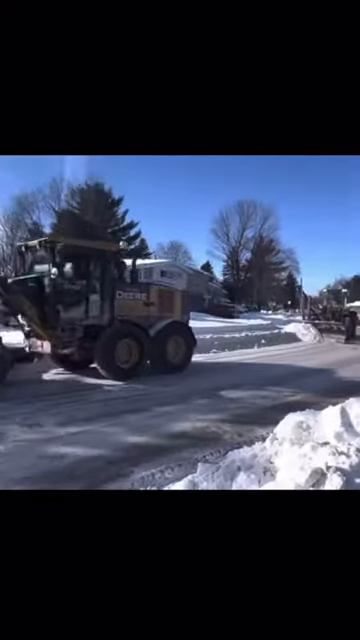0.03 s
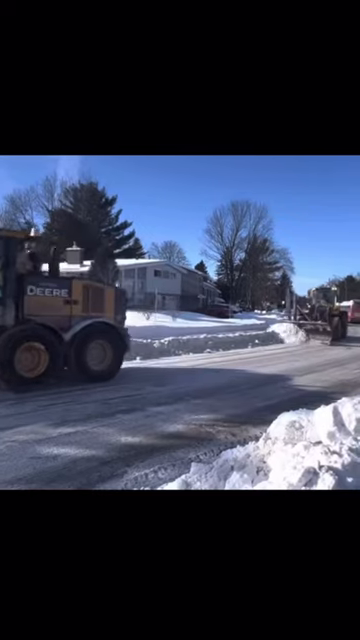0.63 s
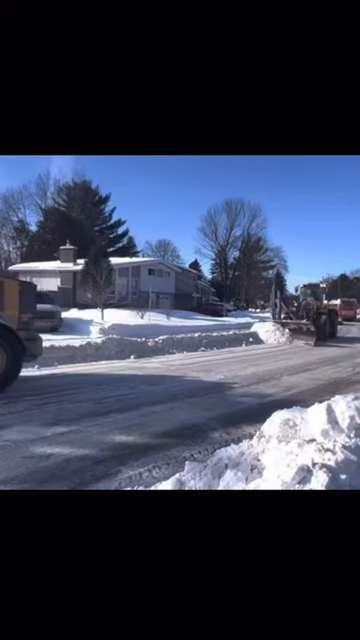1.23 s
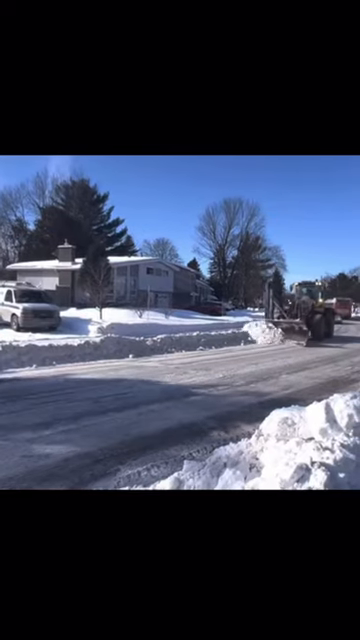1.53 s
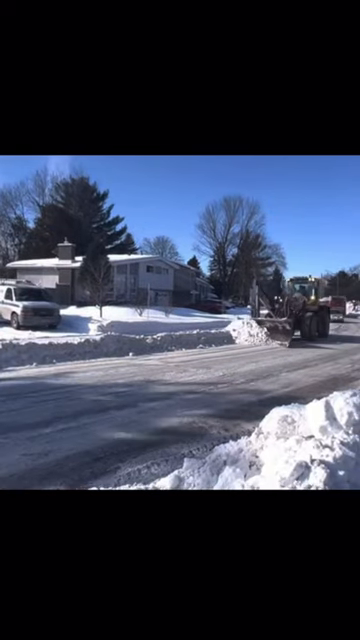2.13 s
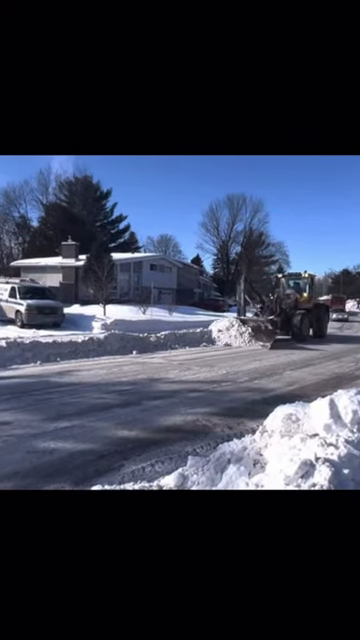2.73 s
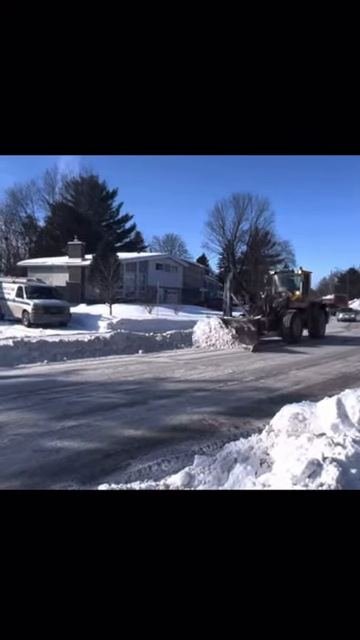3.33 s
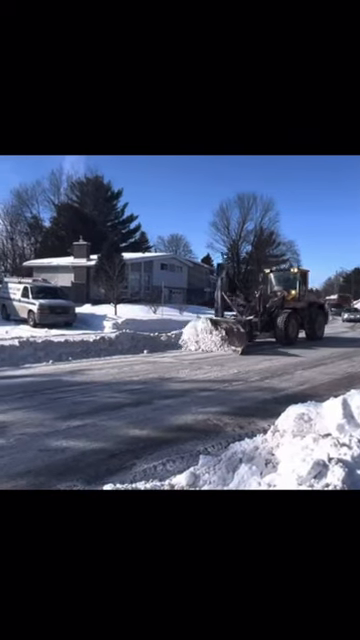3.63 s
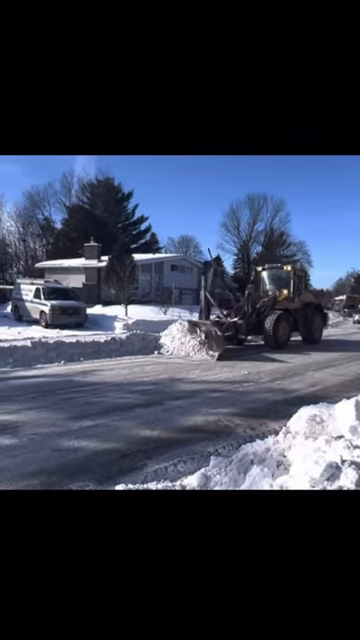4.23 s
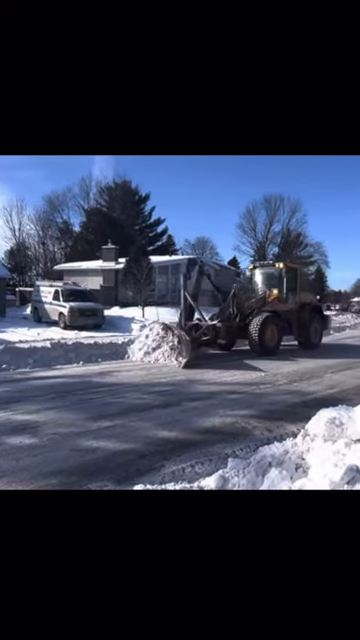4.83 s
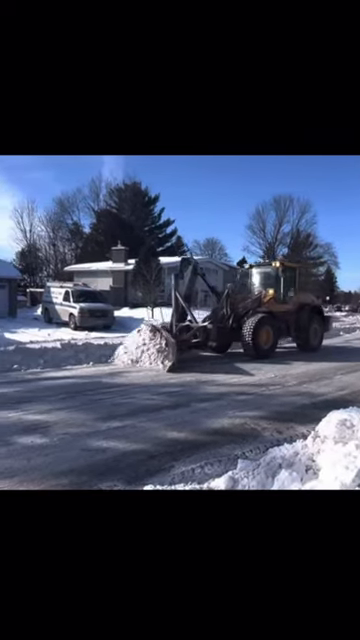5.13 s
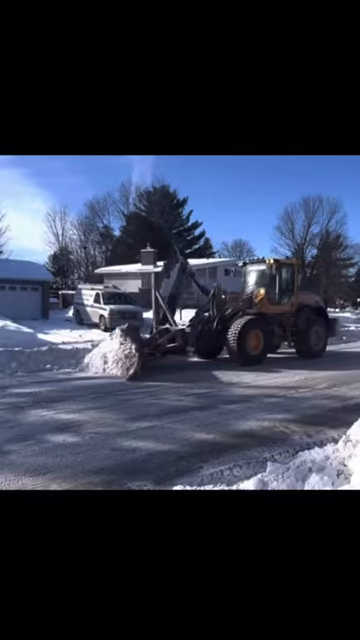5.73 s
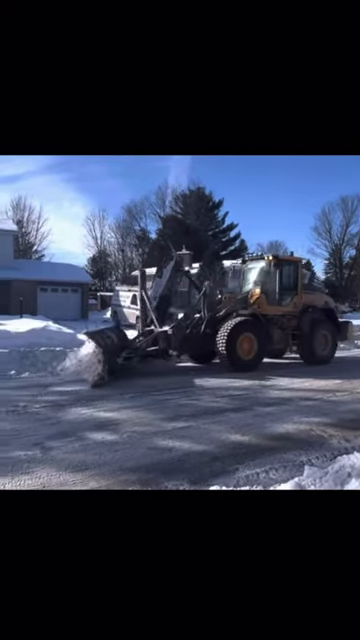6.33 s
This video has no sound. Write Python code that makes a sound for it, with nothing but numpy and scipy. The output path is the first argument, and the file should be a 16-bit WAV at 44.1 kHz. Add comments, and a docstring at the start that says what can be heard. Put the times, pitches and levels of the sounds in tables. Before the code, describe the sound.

Heard in stereo from the side of a residential street, a grader goes by with a loud diesel drone, clatter, rattling links and sharp steel clanks. Its blade scrapes through hard snow and its tyres drum over ice. As it recedes to the left with a wavering whine, an approaching wheel loader growls and shoves snow, ending with a brief, faint hydraulic whine.

```python
"""A grader clears a snowy street

A diesel grader passes close by and drives off to the left, while a wheel loader nears, pushing snow.
The grader's exhaust drones and hisses under a pump whine and a turbo whistle. Tyres rumble, blades
scrape over snow, and steel squeaks and clanks on the road. Two spaced microphone openings (ports)
hear it all, the grader reaching the left one first."""
import sys
import numpy as np
from scipy import signal
from scipy.fft import rfft, irfft, next_fast_len
from scipy.io import wavfile
from scipy.ndimage import uniform_filter1d, map_coordinates

SR = 44100
rng = np.random.default_rng(int(sys.argv[2]) if len(sys.argv) > 2 else 0)


def generate_wav(sig):
    """Save sig (samples, or channels by samples) to the path in sys.argv[1] as 16-bit PCM at SR."""
    pcm = np.round(np.clip(np.atleast_2d(sig).T, -1, 1) * 32767).astype(np.int16)
    wavfile.write(sys.argv[1], SR, pcm)


N = 290619
TIME_S = np.arange(N) / SR

GRADER_M_PER_S, NEAREST_M = 4.71, 4.9
# how each sound of the grader goes by: (loudest at [s], level [dB], falloff [1 = inverse distance])
DRONE_PASS, GEAR_PASS = (.74, -15, .93), (.19, -35, 1.3)
HISS_PASS, SHRILL_PASS = (1.3, -29.5, 1.36), (1.25, -35.5, 1.16)
CLATTER_PASS, RATTLE_PASS = (1, -29, .89), (1.3, -38.5, .95)
SIDE_ROAR_PASS, REAR_ROAR_PASS = (.95, -19.5, .87), (1.74, -19.5, .76)
RUMBLE_PASS, TREAD_PASS = (1, -19, .56), (1.93, -26, 2.2)

# engine speed, sagging under load: (time [s], firing rate [Hz])
ENGINE_SPEED = [(0, 89.9), (1.3, 90.4), (1.85, 86.2), (2.45, 84.9), (2.95, 85.4), (3.25, 86.6), (4.15, 88),
                (4.8, 87.3), (6.58, 87.1)]
# the exhaust's tone at three times the firing rate: (time [s], level [dB])
THIRD_HARMONIC = [(0, -26.5), (.55, -23), (2, -23.8), (2.8, -26.3), (3.4, -29.5), (4.45, -32.5),
                  (4.8, -38.5), (6.58, -43)]
# the pump's whine comes and goes: (time [s], level [dB])
PUMP_LEVEL = [(0, -37), (.32, -31.5), (.45, -36), (.65, -39), (1.15, -32.5), (1.5, -30.5), (1.65, -39),
              (1.98, -27.5), (2.1, -35), (2.22, -25.5), (2.35, -31.5), (2.43, -45), (2.54, -29.5),
              (2.65, -38), (2.71, -26.5), (2.85, -24), (2.93, -40), (3.1, -35.5), (3.4, -46), (3.82, -46),
              (3.9, -36), (4.03, -31), (4.13, -40), (4.26, -34.5), (4.37, -41), (4.56, -32.5), (4.7, -40),
              (4.82, -35.5), (5.12, -30), (5.38, -38), (5.62, -35), (5.86, -50), (6.06, -34.5),
              (6.3, -35.5), (6.45, -42), (6.52, -38)]
# it also sways between the ports: (time [s], extra lead on the left [radians])
PUMP_LEAD = [(0, -.6), (.2, -.8), (.55, 0), (1.4, -.5), (1.8, .1), (2.3, -.15), (2.8, .15), (3.4, 0),
             (4.05, .4), (4.28, 1.9), (4.45, .6), (5.3, 0), (6, .6), (6.58, .6)]
# the turbo speeds up after the sag, then runs down: (time [s], pitch [Hz])
TURBO_PITCH = [(0, 9175), (1.7, 9070), (2.5, 9420), (3.3, 9530), (4.1, 9160), (5.1, 8980), (6.58, 8790)]
# its clean whistle: (time [s], level [dB])
WHISTLE_LEVEL = [(0, -45), (.35, -49), (.75, -44.5), (1.05, -51), (2.1, -55), (2.4, -52), (2.9, -62),
                 (4.35, -59), (5, -47.5), (5.25, -50), (5.6, -63), (6.58, -85)]
# air rushing into the turbo: (time [s], level [dB])
INTAKE_LEVEL = [(0, -44), (1.55, -59), (2, -41), (3.6, -43.5), (4.1, -46), (4.35, -52), (5.2, -51.5),
                (6.58, -54)]
# extra puffs of exhaust gas: (time [s], level [dB], half length [s])
GAS_PUFFS = [(1.27, -40, 0.078), (1.85, -40.5, 0.11), (3.85, -45.5, .13), (4.05, -45, 0.073),
             (4.83, -56, .1), (5.39, -48, 0.11)]
# tones of the timing gears: (pitch [times the firing rate], relative level [dB])
GEAR_TONES = [(13, 0), (14.43, -1)]
# how hard each cylinder knocks, in firing order
KNOCK_STRENGTHS = [1, .25, .7, .2, .5, .35]

# lugged tyres drumming over rough ice: (time [s], level [dB], half length [s])
ICE_PATCHES = [(.9, -24, 0.19), (1.6, -19.5, 0.29), (4.48, -28.5, 0.29), (6.2, -29, 0.46)]
# the blade bites hard snow: (time [s], level [dB], half length [s], brightness [dB/octave], pitch [Hz])
BLADE_BITES = [(0.035, -22, 0.049, 2, 470), (.215, -28, .064, -4, 475), (0.457, -15.5, 0.04, -5, 317),
               (.8, -25, 0.21, -20, 321), (1.235, -17.5, 0.045, -5.5, 475), (1.655, -21.5, 0.09, -1, 463),
               (1.89, -21.5, 0.06, -10, 403), (2.043, -24, 0.19, -5, 427), (2.317, -24, 0.074, -9, 440),
               (2.347, -20.5, 0.15, -7, 304), (2.426, -20, 0.05, 8, 460), (2.498, -18.5, 0.043, 7.5, 460),
               (2.608, -21, 0.065, 4.5, 448), (2.98, -26.5, 0.23, 4, 450), (3.473, -24, 0.047, 10.5, 470),
               (3.713, -26.5, 0.14, 4, 465), (4.337, -29, 0.099, 6, 450), (4.568, -24, .09, 9.5, 468),
               (5.006, -25, 0.038, 4, 468), (5.607, -46, 0.27, 11, 480)]
# how the frame rings, before a bite shifts its pitch: (frequency [Hz], width [Hz], level [dB])
FRAME_MODES = [(460.7, 42, 1), (665, 76, -4), (865, 91, 1)]
# how the blade rings: (frequency [Hz], width [Hz], level [dB])
BLADE_MODES = [(347, 114, 12.5), (710, 160, 8), (1160, 110, -6), (2090, 200, 5), (2630, 80, 0),
               (3640, 400, -14), (4130, 90, 3), (4470, 240, -2), (5200, 60, -6)]
# steel hits the road: (time [s], grind level [dB], time to fade 60 dB [s], strike peak [dB])
ROAD_STRIKES = [(0.3287, -9.5, 0.028, -14), (.337, -9, 0.026, -18), (0.3422, -12, .045, -8),
                (.3515, -17, .065, -21), (.389, -24, 0.13, -28), (0.469, -23, .062, -30),
                (.617, -27, .13, -24), (0.679, -20, .26, -21), (0.774, -20, .045, -21),
                (.964, -19.5, 0.24, -23), (1.01, -19.5, 0.11, -15), (1.064, -20.5, 0.15, -19),
                (1.079, -24, 0.049, -17), (1.21, -19.5, 0.12, -19), (1.271, -22.5, .06, -22),
                (1.744, -22.5, 0.065, -23), (1.972, -23, 0.052, -26)]
CONTACT_S = .00061  # how long a grind or a tap takes to build up
# steel rubs and squeaks: (time [s], level [dB], half length [s], main note [Hz])
STEEL_SQUEAKS = [(.073, -30.5, .008, 4130), (.08, -30, .013, 2620), (.085, -36, .045, 4120),
                 (.103, -25.5, .015, 4118), (.4, -33, .022, 4115), (4.71, -43.5, .03, 5080),
                 (5.17, -49, .11, 4720)]
# the side tones of each squeak: (frequency [Hz], relative level [dB], roughness [radians])
SQUEAK_TONES = [(2630, 0, 1.5), (5245, -5, 1.1), (5900, -6, 1)]

# a bright hiss, with a narrow gap near 8 kHz that is not the machines' own sound:
# (frequency [Hz], relative level [dB])
HISS_WITH_GAP = [(3000, -25), (5000, 10.5), (6500, 10), (8100, -73), (8900, 10.5), (9500, 12), (11000, 14),
                 (13000, 17), (14500, 12), (15500, -12)]
# tone colours of the clatter, rumble, roars and loader: (frequency [Hz], relative level [dB])
CLATTER_COLOUR = [(900, -23), (1600, 10), (1900, 3), (2150, 8), (2500, 3.5), (3000, -4), (3500, -0.5),
                  (4100, 0.5), (4600, -4.5), (5100, -7), (5800, -32), (6800, -1.5), (8500, -36),
                  (14000, -23)]
RUMBLE_COLOUR = [(18, -42), (30, -32), (40, -14), (52, -8.5), (72, -1.5), (105, -10.5), (135, -4),
                 (165, -2), (200, -5.5), (250, -5.5), (330, -14), (600, -62)]
SIDE_ROAR_COLOUR = [(120, -38), (240, -11.5), (315, 8), (385, -3), (470, 1.5), (570, -0.5), (700, 4),
                    (870, -1.5), (1050, -8), (1250, -3.5), (1550, -22), (1900, -53), (3000, -34)]
REAR_ROAR_COLOUR = [(120, -19), (250, -3.5), (320, 2), (440, -5.5), (560, -2.5), (700, -1), (890, 0),
                    (1040, 0), (1250, -9), (1550, -8), (1900, -21), (3000, -69)]
LOADER_COLOUR = [(60, -6), (125, 10.5), (170, 1), (260, -8), (450, 2.5), (650, -3.5), (950, -15.5),
                 (1400, -13), (2250, -12.5), (3000, -25.5), (4100, -20.5), (5000, -29), (5700, -26.5),
                 (7000, -55), (10000, -74)]
# the loader's hydraulics whine: (time [s], level [dB], half length [s])
HYDRAULIC_SWELLS = [(6.36, -42.5, .17)]

# echoes from house fronts: (starting delay [s], level [dB])
WALL_ECHOES = [(.013, -9.5), (.031, -17), (.058, -19.5)]
# how much sooner the left port hears the grader: (time [s], engine [ms], blade and tyres [ms], steel [ms])
LEFT_LEAD = [(0, .29, .32, .22), (.45, .34, .37, .24), (1.1, .4, .44, .33), (2.1, .45, .48, .45),
             (3, .46, .47, .47), (6.58, .47, .47, .47)]
# how alike noise is at the two ports: (frequency [Hz], likeness [0-1])
PORT_LIKENESS = [(60, 0.65), (200, 1), (500, 0.88), (900, 1), (1500, 0.87), (2200, 0.4), (3000, 0.12),
                 (4300, 0.17), (7000, 0.032), (14000, 0.1)]
# the microphone housing shades the ports: (frequency [Hz], left minus right [dB])
HOUSING_SHADE = [(80, 0.5), (300, 0.9), (750, 3.5), (1050, 1.5), (1550, -4), (2000, -0.5), (2700, -1),
                 (3900, 5), (5100, 3), (6800, 0.5), (10000, -0.5)]
# sound bends around that housing: (frequency [Hz], extra lead on the left [radians])
HOUSING_BEND = [(100, -0.13), (500, 0.031), (1000, -0.64), (1400, -0.93), (1700, -1.02), (2000, 0.73),
                (2500, 0.3), (3000, 0.84), (4200, -0.16)]


def exhaust(firings, drone_db_per_hz=.5):
    """Six cylinders fire into a pipe, which favours the firing rate and the tone at three times that."""
    tone = lambda multiple: np.sqrt(2) * np.sin(2 * np.pi * (multiple * firings + rng.random()))
    third_db, = curves(THIRD_HARMONIC)
    firing_hz, = curves(ENGINE_SPEED)
    sag_db = drone_db_per_hz * (firing_hz - firing_hz.mean())  # a slower engine drones less
    unsteady_db = .6 * wobble(14) + .3 * wobble(60)
    drone = amp(passing(*DRONE_PASS) + sag_db + unsteady_db) * tone(1)
    raspy_tone = np.sqrt(2) * np.sin(2 * np.pi * 3 * firings + .42 * wobble(45))
    third = amp(third_db) * unit(amp(1.8 * wobble(40))) * raspy_tone
    # unequal cylinders add weak tones at sixths of the firing rate
    uneven = sum(amp(4 * wobble(2)) * tone(k / 6) for k in range(8, 44))
    # the block buzzes at multiples of the crankshaft speed, mostly out of the side grilles
    buzz = sum(amp(3 * wobble(7)) * tone(k / 3) / k for k in range(12, 78))
    buzz_db = third_db - 4 - 10.6 * tail_share()
    return drone + third + amp(third_db - 3) * unit(uneven) + amp(buzz_db) * unit(buzz)


def pump(firings, cycles_per_firing=19.28):
    """The pump sings a fluttering note that follows the engine speed."""
    level_db = curves(PUMP_LEVEL)[0] + 1.7 * wobble(60)
    waver = .6 * wobble(24) + .36 * wobble(110) + .1 * np.array([wobble(8), wobble(8)])
    sway = curves(PUMP_LEAD)[0] * np.array([[.5], [-.5]])
    return np.sqrt(2) * amp(level_db) * np.sin(2 * np.pi * cycles_per_firing * firings + waver + sway)


def turbo(turbo_cycles):
    """The spinning turbocharger gives a thin, high whistle."""
    flutter = .8 * np.array([wobble(70), wobble(70)])
    level_db = curves(WHISTLE_LEVEL)[0] + 2.4 * wobble(13)
    return np.sqrt(2) * amp(level_db) * np.sin(2 * np.pi * turbo_cycles + flutter)


def rushing_gas(firings, turbo_cycles):
    """Gas hisses in puffs, while a shrill rush and the air intake follow the turbo's pitch."""
    def band(multiple, width_hz):
        slow_noise = filtered(noise_pair(), lambda hz: 1 / (1 + (hz / width_hz) ** 2))
        return unit(np.sin(2 * np.pi * multiple * turbo_cycles) * slow_noise)

    puffs = swells(GAS_PUFFS)
    hiss = (amp(passing(*HISS_PASS)) + puffs) * spread(patchy(depth_db=1.4), HISS_WITH_GAP)
    shrill = (amp(passing(*SHRILL_PASS)) + puffs) * band(multiple=1.56, width_hz=260)
    intake = amp(curves(INTAKE_LEVEL)[0] + 2.2 * wobble(32)) * band(multiple=.535, width_hz=380)
    throb = unit(np.exp(.088 * np.cos(2 * np.pi * firings)))  # one swell for each firing
    surge = amp(.5 * wobble(8) + .8 * wobble(18) + .3 * wobble(40))
    return (hiss + shrill + intake) * throb * surge


def gears(firings):
    """The timing gears sing, loudest while the engine's side faces the listener."""
    tone = lambda multiple: np.sin(2 * np.pi * multiple * firings + .5 * wobble(30))
    teeth = sum(amp(db + wobble(6.2)) * tone(multiple) for multiple, db in GEAR_TONES)
    return amp(passing(*GEAR_PASS)) * unit(teeth)


def clatter(firings, knock_s=.003):
    """The engine knocks at each firing, among the crunch of breaking ice."""
    since_firing_s = firings % 1 / curves(ENGINE_SPEED)[0]
    strength = np.take(KNOCK_STRENGTHS, firings.astype(int), mode="wrap")
    blows = strength * np.exp(-since_firing_s / knock_s)
    knock = patchy(depth_db=1.3) * unit(1 + .73 * blows)
    crunch = .3 * bursts(per_s=90, fade_s=.006, scatter_db=1.5) * noise_pair()
    return amp(passing(*CLATTER_PASS) + .5 * wobble(21.2)) * spread(knock + crunch, CLATTER_COLOUR)


def ploughing(screen_db=3.5):
    """Tyres rumble and the blade roars over packed snow; from behind, the body screens the rumble."""
    behind = tail_share()
    rumble_db = passing(*RUMBLE_PASS) - screen_db * behind + 1.9 * wobble(10)
    rumble = amp(rumble_db) * spread(noise_pair(), RUMBLE_COLOUR)
    judder = amp(.5 * wobble(15))  # the blade catches and slips
    # the roar is hollower from behind than from the side
    side = amp(passing(*SIDE_ROAR_PASS)) * spread(patchy(depth_db=2), SIDE_ROAR_COLOUR)
    rear = amp(passing(*REAR_ROAR_PASS)) * spread(patchy(depth_db=1.2), REAR_ROAR_COLOUR)
    return rumble + judder * (np.sqrt(1 - behind) * side + np.sqrt(behind) * rear)


def tyre_drumming(pitch_hz=165.6, width_hz=62):
    """Lugged tyres roll over rough ice and boom around one low note."""
    boom = filtered(rng.standard_normal(N), lambda hz: ringing([(pitch_hz, width_hz, 0)], hz) ** 2)
    return (amp(passing(*TREAD_PASS)) + swells(ICE_PATCHES)) * unit(boom)


def frame_groans():
    """The frame groans whenever the blade bites, its pitch set by the strain."""
    rub = spread(noise_pair(), [(70, -60), (170, -14), (350, 0), (950, -3), (1250, -45)])

    def groan(tilt_db, pitch_hz):
        scale = FRAME_MODES[0][0] / pitch_hz  # moves the lowest ring to the bite's pitch
        response = lambda hz: ringing(FRAME_MODES, hz * scale) * amp(tilt_db * np.log2(hz + 1))
        return unit(filtered(rub, response))

    return sum(swells([bite]) * groan(tilt_db, pitch_hz) for *bite, tilt_db, pitch_hz in BLADE_BITES)


def clanks(thud_db=-8.5, hard_hz=4300):
    """Each hard strike on the road rings the blade, with a short grind and a thud through the frame."""
    envelope, strikes = np.zeros((2, N))
    for start_s, grind_db, fade_s, strike_db in ROAD_STRIKES:
        age_s = TIME_S - start_s
        rise = np.clip(age_s / CONTACT_S + 1, 0, 1)
        envelope += rise * amp(grind_db - 60 * np.maximum(age_s, 0) / fade_s)
        strikes[round(start_s * SR)] += amp(strike_db)
    blade = lambda hz: ringing(BLADE_MODES, hz)
    scrape = spread(noise_pair(), [(5200, 18), (9000, -15)])
    grind = filtered(envelope * scrape, blade) / np.std(filtered(scrape, blade))
    dull_noise = spread(noise_pair(), [(120, -3), (260, -12), (800, 7), (1800, 9), (3000, -43)])
    thud = amp(thud_db) * envelope * dull_noise
    # a hard strike favours the blade's high notes
    struck_blade = lambda hz: blade(hz) * ringing([(hard_hz, hard_hz, 0)], hz)
    ring_peak = np.abs(filtered(signal.unit_impulse(N), struck_blade)).max()
    return grind + thud + filtered(strikes, struck_blade) / ring_peak


def squeaks(side_db=-8):
    """Rubbing steel sticks and slips, singing a main note and a few rough side tones."""
    tone = lambda hz, rough: np.sin(2 * np.pi * hz * TIME_S + rough * wobble(260))
    sides = amp(side_db) * unit(sum(amp(db) * tone(hz, rough) for hz, db, rough in SQUEAK_TONES))
    grip = unit(amp(2.2 * wobble(308)))
    return grip * sum(swells([rub]) * (unit(tone(hz, rough=.58)) + sides) for *rub, hz in STEEL_SQUEAKS)


def rattle(taps_per_s=62, pitch_hz=2170, spread_hz=130, scatter_db=4, fade_s=.026):
    """Loose steel links chatter at an uneven pace, each tap with its own pitch and strength."""
    count = int(taps_per_s * N / SR)
    late, detune, size = rng.uniform(-1, 1, (count, 3)).T[:, :, None]
    age_s = np.arange(SR // 20) / SR
    starts = ((np.arange(count)[:, None] + 1 + late) * SR / taps_per_s).astype(int)
    envelope = amp(scatter_db * size - 60 * age_s / fade_s) * (1 - np.exp(-age_s / CONTACT_S))
    taps = envelope * np.sin(2 * np.pi * (pitch_hz + spread_hz * detune) * age_s)
    positions = starts + np.arange(len(age_s))
    chatter = unit(np.bincount(positions.ravel(), taps.ravel(), N)[:N])  # adds each tap in its place
    return amp(passing(*RATTLE_PASS)) * np.array([chatter, chatter])


def loader(start_db=-39, start_m=36.3, m_per_s=4.22, hiss_db=-25):
    """Straight ahead of the listener, the loader growls, hisses and shoves snow, louder as it nears."""
    distance_m = np.maximum(start_m - m_per_s * TIME_S, NEAREST_M)
    shove = patchy(depth_db=1.5) + .5 * bursts(per_s=76, fade_s=.0063, scatter_db=2) * noise_pair()
    hiss = amp(hiss_db) * spread(noise_pair(), HISS_WITH_GAP)
    lurch_db = .9 * wobble(16)
    return amp(start_db + lurch_db) * start_m / distance_m * (spread(shove, LOADER_COLOUR) + hiss)


def hydraulics(pitch_hz=1290):
    """The loader's hydraulics give a short, unsteady whine as it comes close."""
    return swells(HYDRAULIC_SWELLS) * unit(np.sin(2 * np.pi * pitch_hz * TIME_S + 1.5 * wobble(70)))


def street(sound, delay_growth=.0006):
    """House fronts echo all but the bass; the echoes come later as the grader drives on."""
    n = np.arange(N)
    bright = filtered(sound, lambda hz: np.clip(hz / 300 - 1, 0, 1))
    for delay_s, db in WALL_ECHOES:
        read_at = (1 - delay_growth) * n - delay_s * SR
        sound = sound + amp(db) * np.array([np.interp(read_at, n, side, period=N) for side in bright])
    return sound


def ports(pair, lead_ms):
    """Sound from the left reaches that port first; the housing shades and delays each port differently."""
    shift = lead_ms * SR / 1000 / 2
    earlier = lambda side, by: map_coordinates(side, [np.arange(N) + by], order=5, mode="mirror")
    arriving = np.array([earlier(pair[0], shift), earlier(pair[1], -shift)])
    housing = lambda hz: amp(along(HOUSING_SHADE, hz)) * np.exp(1j * along(HOUSING_BEND, hz))
    return filtered(arriving, lambda hz: housing(hz) ** np.array([[.5], [-.5]]))  # half to each port


def passing(peak_s, peak_db, falloff):
    """Level in dB of a part of the grader as it drives by in a straight line."""
    travelled_m = GRADER_M_PER_S * (TIME_S - peak_s)
    return peak_db - falloff * 20 * np.log10(np.hypot(travelled_m, NEAREST_M) / NEAREST_M)


def tail_share(halfway_s=1.64, turn_s=.32):
    """How far the grader has turned its tail to the listener, from 0 to 1."""
    return .5 + .5 * np.tanh((TIME_S - halfway_s) / (2 * turn_s))


def amp(db):
    """Turn decibels into a gain."""
    return 10 ** (np.asarray(db) / 20)


def unit(x):
    """Scale x to an average (rms) level of 1."""
    return x / np.sqrt(np.mean(x ** 2) + 1e-20)


def along(points, hz):
    """Read between (frequency [Hz], value) points, with octaves evenly spaced."""
    point_hz, values = np.transpose(points)
    return np.interp(np.log(hz + 1), np.log(point_hz + 1), values)


def curves(rows):
    """One value per sample for each column after the time."""
    times_s, *columns = np.transpose(rows)
    return [np.interp(TIME_S, times_s, column) for column in columns]


def swells(rows):
    """Smooth rises and falls from rows of (time [s], level [dB], half length [s])."""
    return sum(amp(db) * np.exp(-((TIME_S - peak_s) / half_s) ** 2) for peak_s, db, half_s in rows)


def wobble(per_s):
    """A smooth curve through this many random values a second."""
    return map_coordinates(rng.standard_normal(int(N * per_s / SR) + 4), [TIME_S * per_s])


def bursts(per_s, fade_s, scatter_db):
    """The loudness outline of short random impacts of uneven size."""
    blows = (rng.random(N) < per_s / SR) * amp(scatter_db * np.clip(rng.standard_normal(N), -2, 2))
    fade = np.exp(-np.arange(SR // 10) / SR / fade_s)
    return unit(signal.fftconvolve(blows, fade)[:N])


def noise_pair():
    """Two unrelated white noises."""
    return rng.standard_normal((2, N))


def patchy(depth_db):
    """Two noises whose level drifts in patches of time and frequency."""
    spectra = signal.stft(noise_pair(), nperseg=1024)[2]
    patches = uniform_filter1d(rng.standard_normal(spectra.shape[1:]), size=7, axis=0)
    patches = uniform_filter1d(patches, size=9, axis=1)
    return signal.istft(spectra * amp(depth_db * unit(patches)), nperseg=1024)[1][:, :N]


def filtered(x, response):
    """Multiply each frequency in x by response(hz)."""
    size = next_fast_len(N + SR // 2)
    return irfft(rfft(x, size) * response(np.fft.rfftfreq(size, 1 / SR)), size)[..., :N]


def ringing(modes, hz):
    """How an object answers each frequency, from its (frequency [Hz], width [Hz], level [dB]) modes."""
    return sum(amp(db) * 1j * hz * width / (centre ** 2 - hz ** 2 + 1j * hz * width)
               for centre, width, db in modes)


def spread(pair, spectrum):
    """Shape two unrelated noises by (frequency [Hz], level [dB]) points into partly alike channels."""
    def response(hz):
        angle = np.arccos(np.clip(along(PORT_LIKENESS, hz), -1, 1)) / 2
        return amp(along(spectrum, hz)) * [np.cos(angle), np.sin(angle)]

    shared, opposite = filtered(pair, response)
    return unit(np.array([shared + opposite, shared - opposite]))


def scene():
    """The grader's engine, blade and steel each arrive from their own direction; the loader follows."""
    firings = np.cumsum(curves(ENGINE_SPEED)[0]) / SR  # firings counted so far
    turbo_cycles = np.cumsum(curves(TURBO_PITCH)[0]) / SR
    engine = exhaust(firings) + pump(firings) + turbo(turbo_cycles) + gears(firings)
    engine += rushing_gas(firings, turbo_cycles) + street(clatter(firings) + rattle())
    blade = street(ploughing()) + tyre_drumming() + frame_groans()
    steel = clanks() + squeaks()
    engine_lead_ms, blade_lead_ms, steel_lead_ms = curves(LEFT_LEAD)
    grader = ports(engine, engine_lead_ms) + ports(blade, blade_lead_ms) + ports(steel, steel_lead_ms)
    return grader + loader() + hydraulics()


def record(dry):
    """The recorder rounds off the highest peaks and cuts the very highest treble."""
    ceiling, top_hz = .95, 14700
    rounded = dry / (1 + np.abs(dry / ceiling) ** 8) ** (1 / 8)
    return filtered(rounded, lambda hz: hz < top_hz)


dry = scene()
out = record(dry)
generate_wav(out)
```